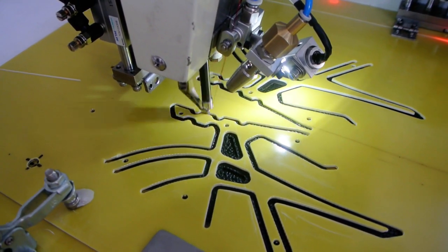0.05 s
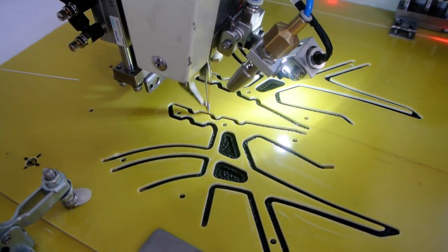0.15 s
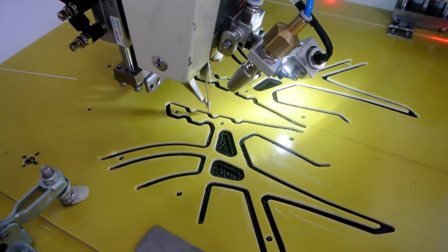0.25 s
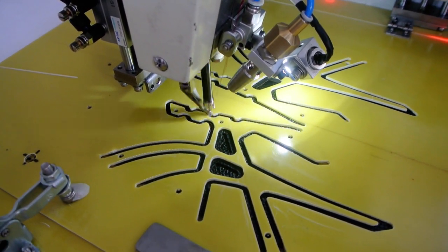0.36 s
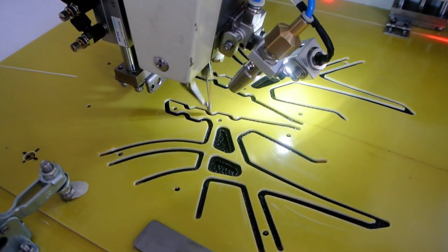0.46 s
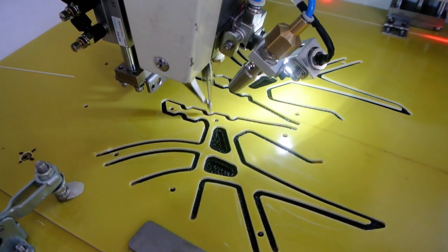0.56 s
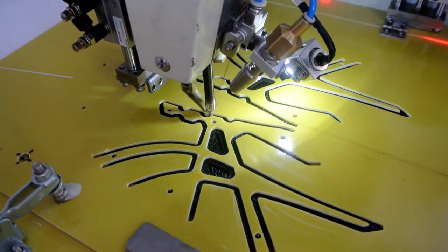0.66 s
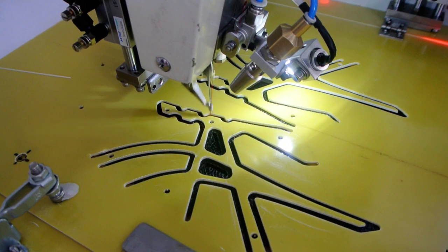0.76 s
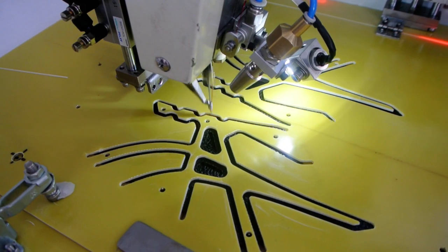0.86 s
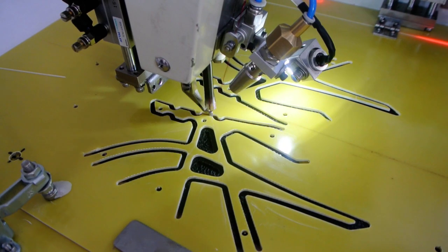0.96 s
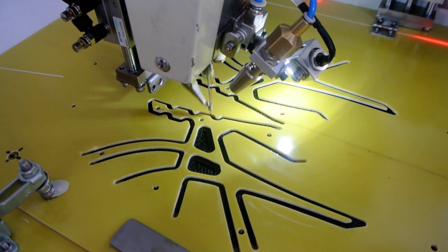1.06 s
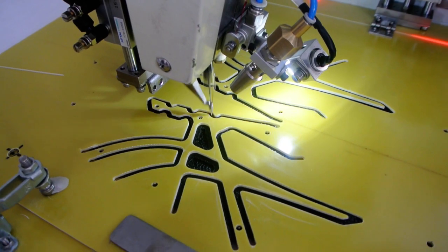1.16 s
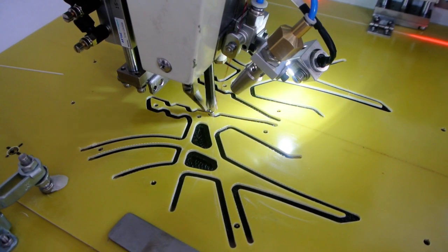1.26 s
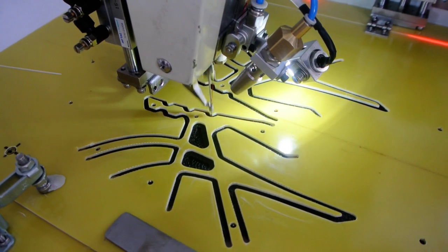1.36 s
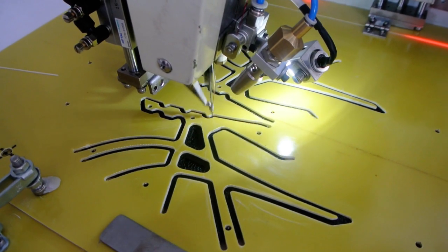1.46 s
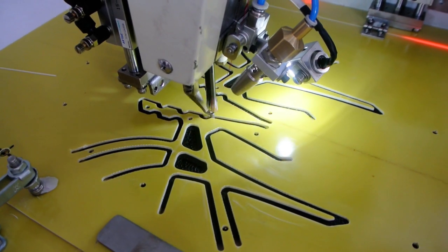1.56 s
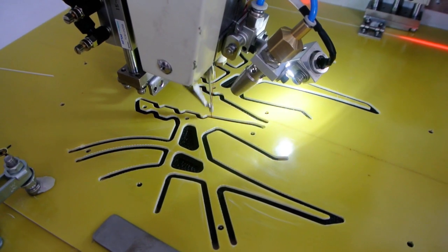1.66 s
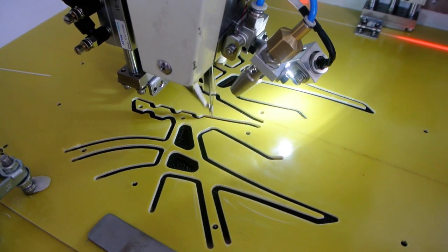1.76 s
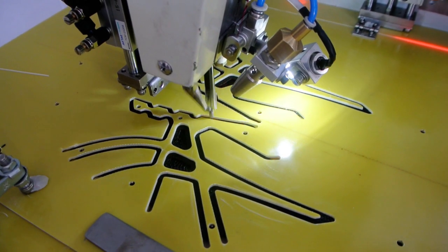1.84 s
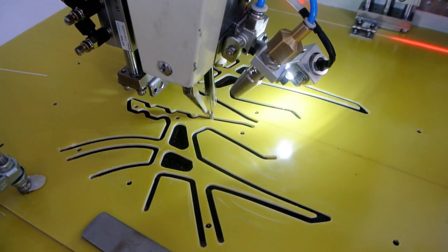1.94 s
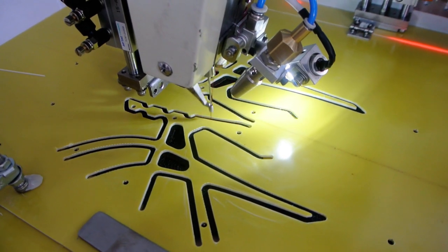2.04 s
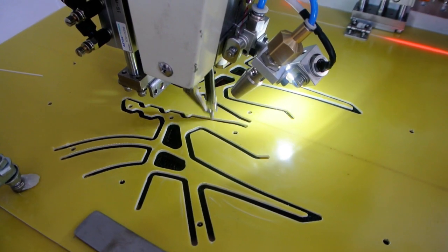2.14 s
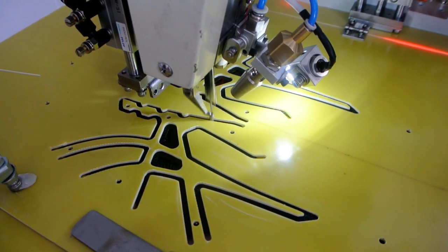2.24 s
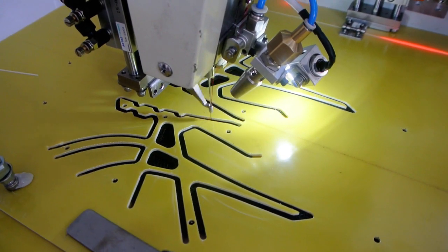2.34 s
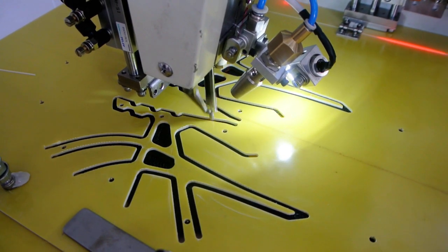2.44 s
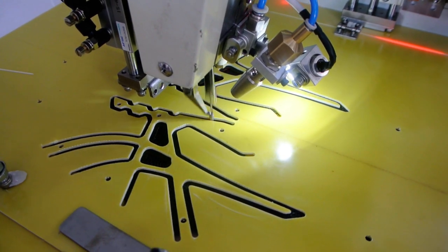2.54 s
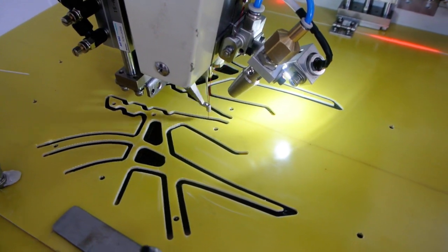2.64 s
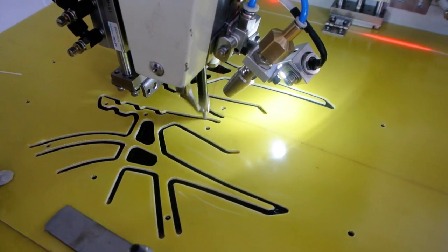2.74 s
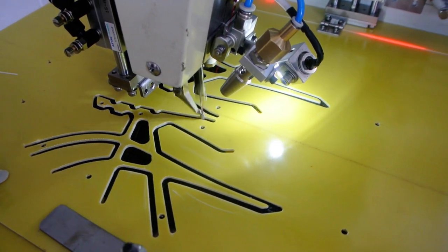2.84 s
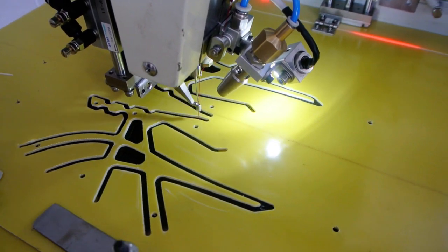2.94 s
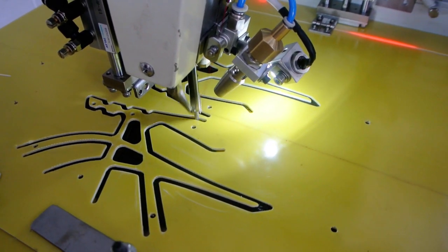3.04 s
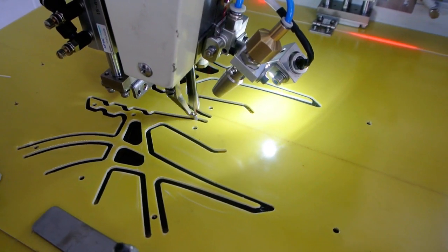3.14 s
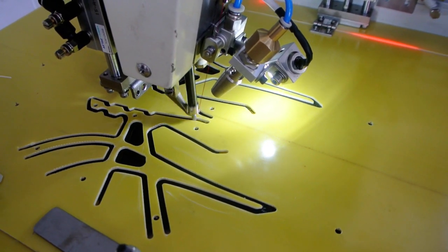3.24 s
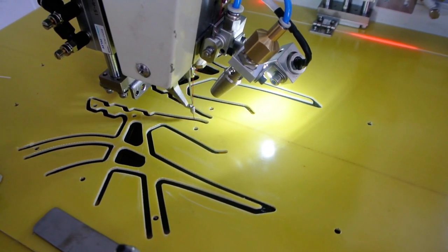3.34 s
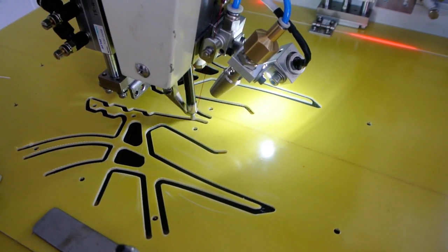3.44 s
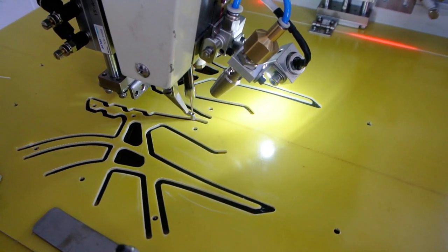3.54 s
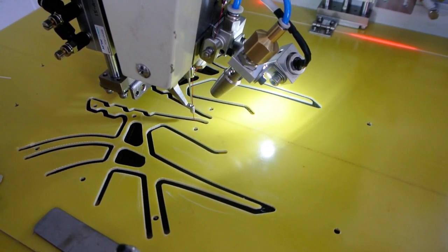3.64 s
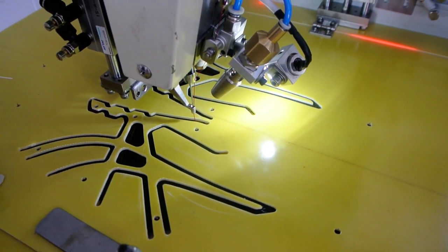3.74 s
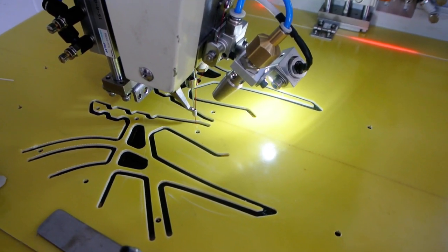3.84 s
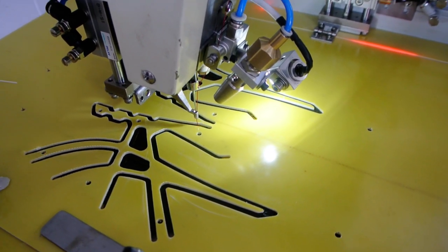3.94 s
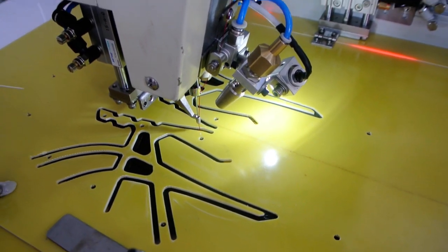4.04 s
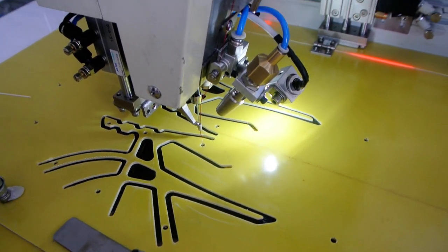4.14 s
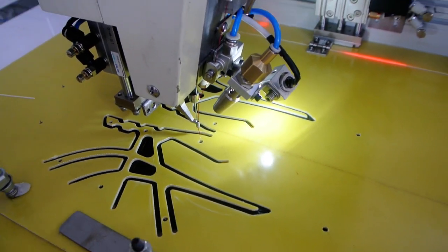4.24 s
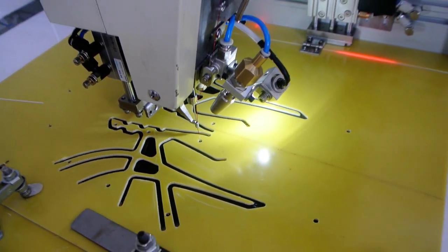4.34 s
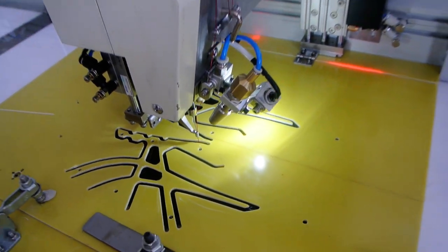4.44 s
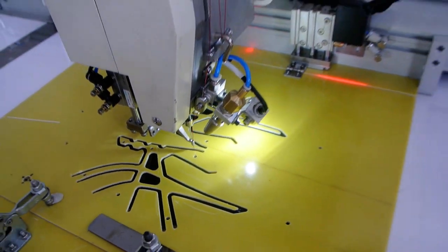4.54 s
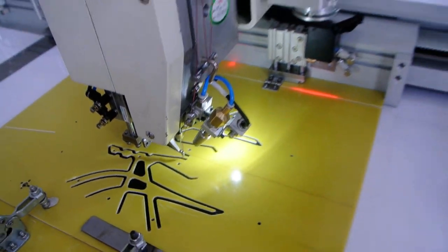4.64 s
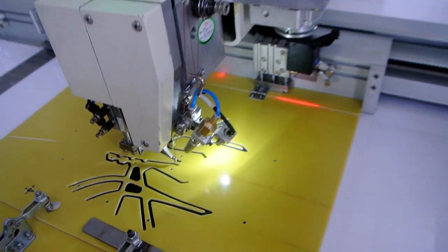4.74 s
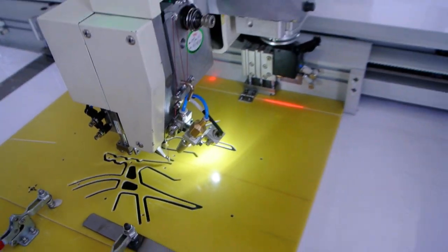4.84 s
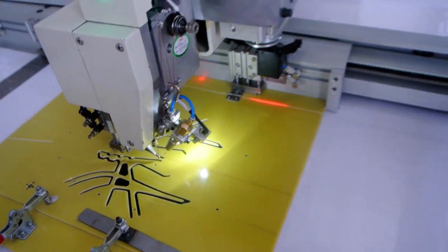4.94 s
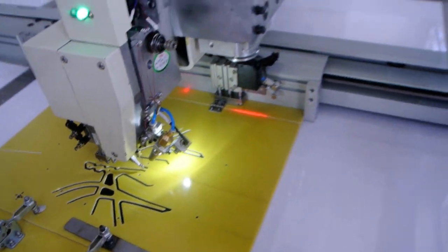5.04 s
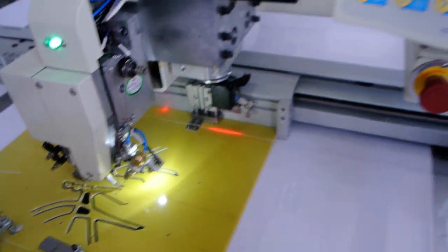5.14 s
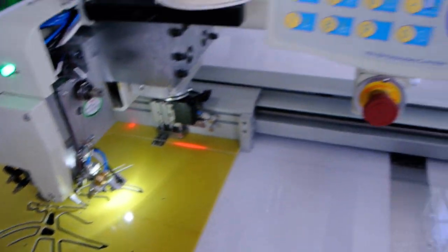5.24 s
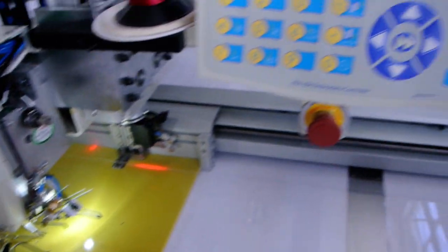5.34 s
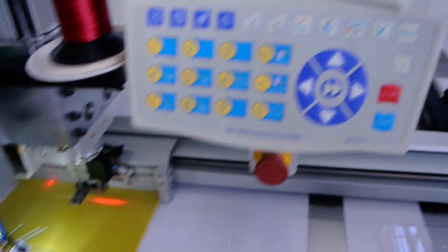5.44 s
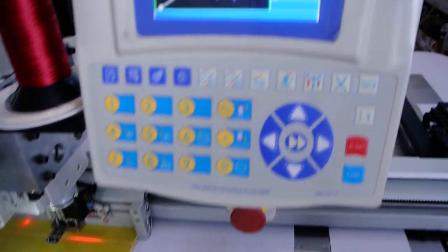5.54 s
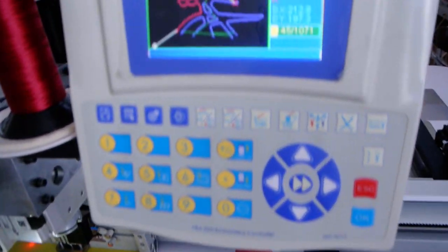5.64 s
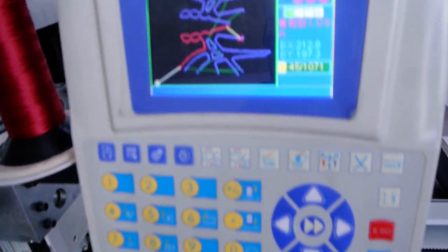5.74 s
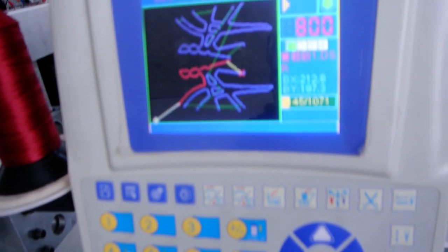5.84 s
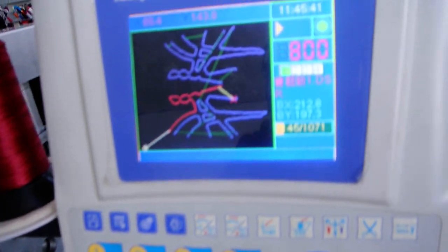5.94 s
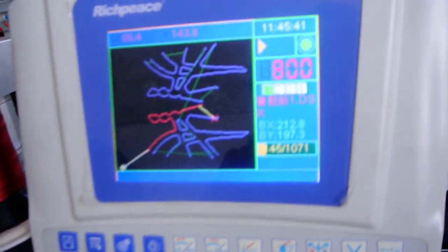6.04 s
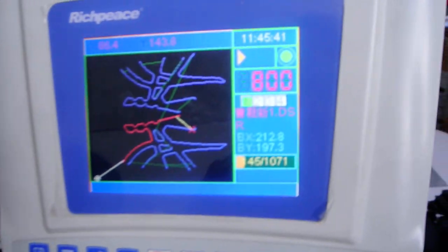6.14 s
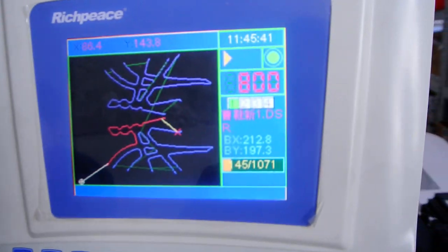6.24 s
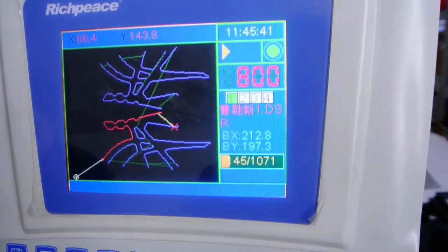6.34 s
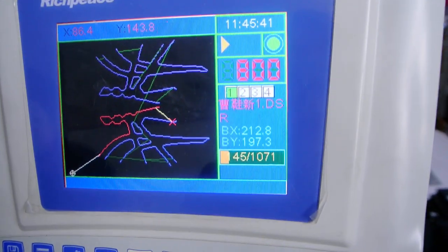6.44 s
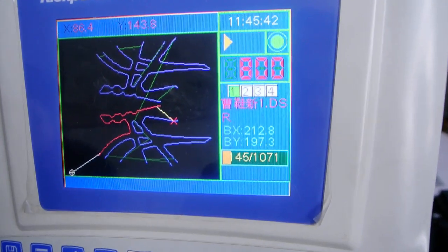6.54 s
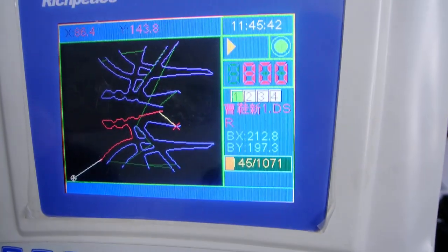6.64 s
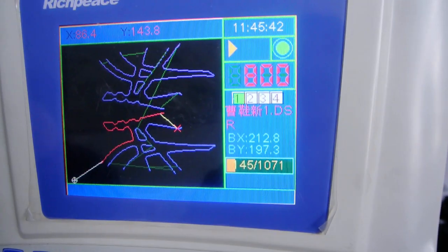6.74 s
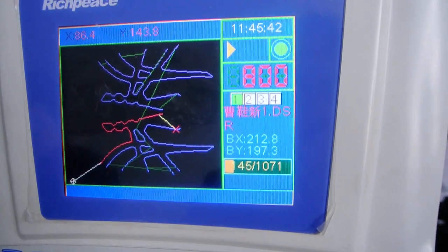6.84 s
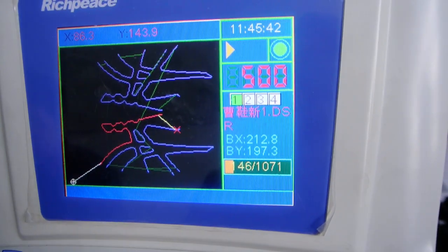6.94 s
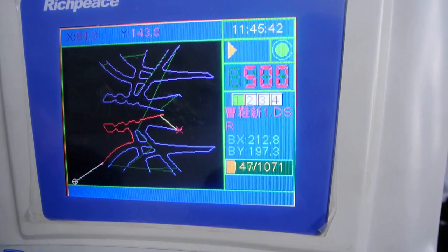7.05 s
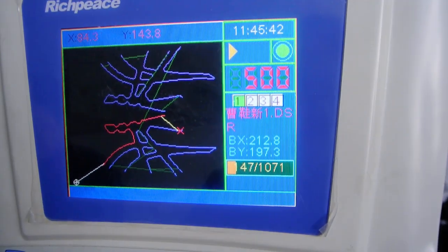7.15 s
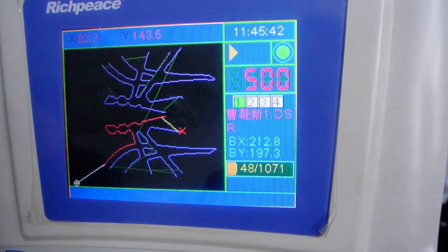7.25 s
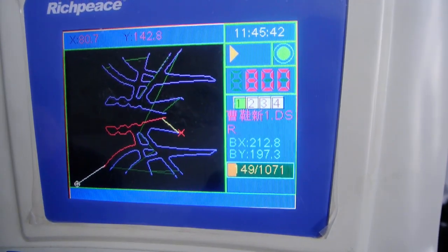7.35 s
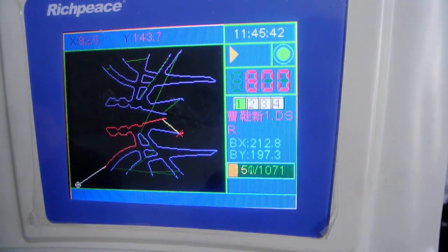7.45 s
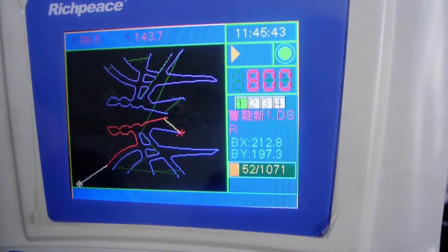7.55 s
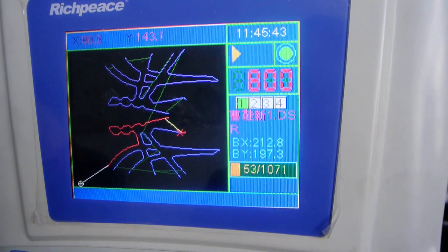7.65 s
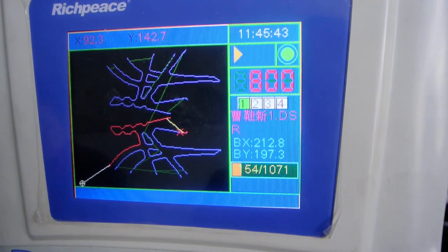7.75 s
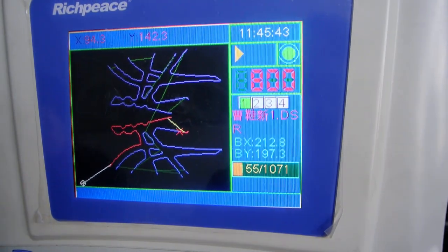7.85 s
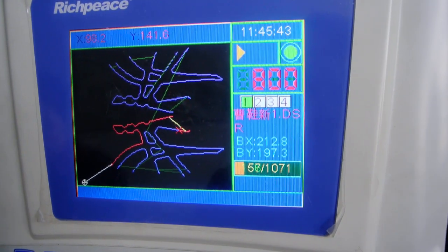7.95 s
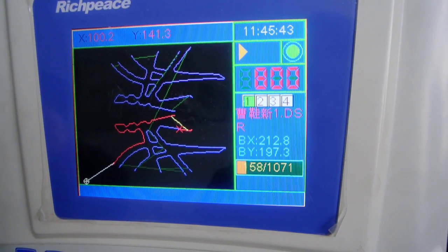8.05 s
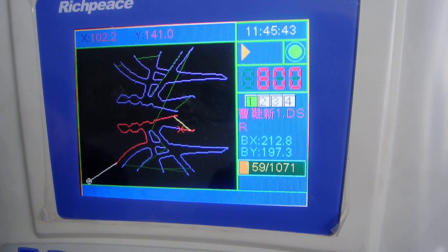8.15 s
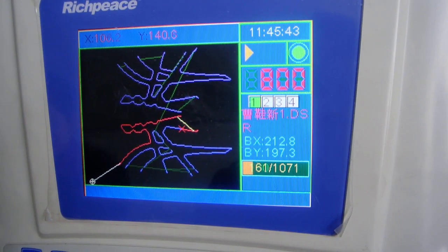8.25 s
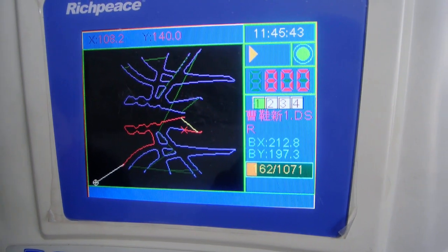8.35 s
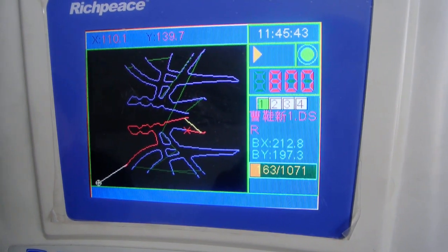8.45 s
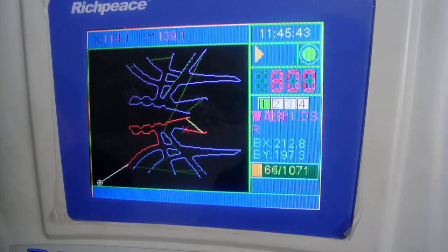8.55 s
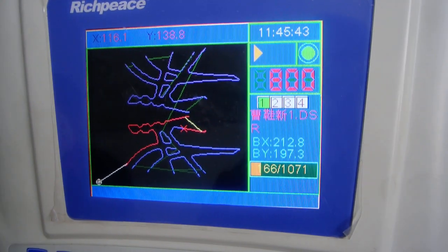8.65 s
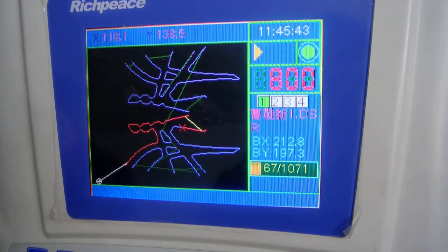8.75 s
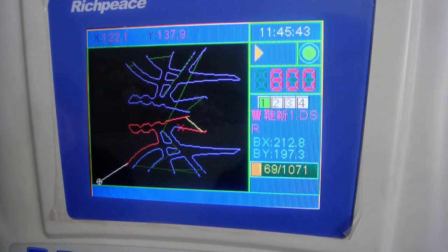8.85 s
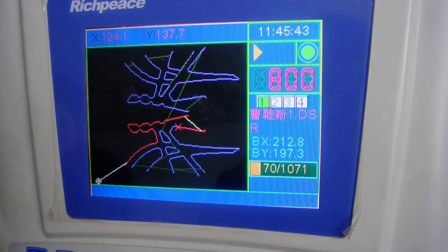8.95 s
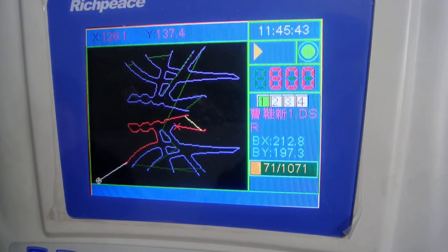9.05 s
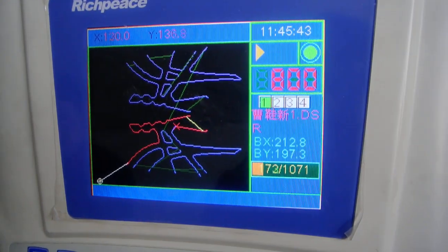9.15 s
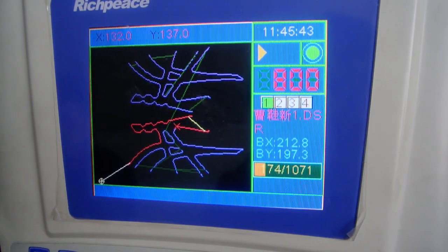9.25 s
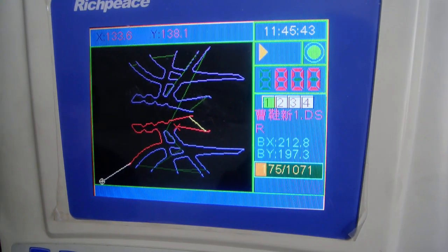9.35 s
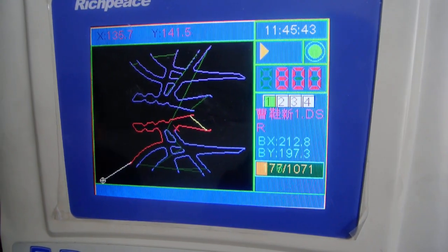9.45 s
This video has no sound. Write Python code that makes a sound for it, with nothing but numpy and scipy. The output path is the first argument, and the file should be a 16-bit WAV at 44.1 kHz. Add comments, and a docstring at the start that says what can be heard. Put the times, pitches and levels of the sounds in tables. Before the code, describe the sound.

Bright, steady air-jet hiss with a fluttering high whistle cuts off into valve clicks, two servo whines and booming thumps, then blasts back on.

```python
"""The air jet of a laser cutter's cutting head, close by: filtered noise with a fluttering nozzle resonance.
The carriage drive whirrs under it (coloured noise and wavering tones), and the hall rumbles below. The jet
shuts off; noise bursts click for valves and linkage, and a servo's stack of tones whines through two quick
moves. Knocks and thumps are short swelling cycles. During the pause the microphone moves from the head to the
control panel, where the jet starts again."""
import sys
import numpy as np
from scipy import signal
from scipy.fft import rfft, irfft
from scipy.io import wavfile
from scipy.ndimage import uniform_filter1d, map_coordinates

SR = 44100
rng = np.random.default_rng(int(sys.argv[2]) if len(sys.argv) > 2 else 0)


def wav_record(signal):
    """Record a signal, one row per channel, as 16-bit PCM in the file named by sys.argv[1]."""
    frames = np.transpose(np.atleast_2d(signal))
    bounded = np.clip(frames, -1, 1)
    # unit amplitude maps onto the largest positive 16-bit level
    quanta = np.round(bounded * 32767).astype(np.int16)
    wavfile.write(sys.argv[1], SR, quanta)


N = 418509
TIME = np.arange(N) / SR  # s
HZ = np.fft.rfftfreq(N, 1 / SR)

# All colour tables give relative spectral levels: frequency_hz, level_db (per Hz).
# Colour of the jet, close to the head and beside the panel: frequency_hz, level_db
JET_COLOUR_HEAD = [(880, -36.5), (1500, -33.5), (2000, -24.5), (2770, -26), (4330, -21.5), (4730, -20),
                   (5490, -14), (6630, 1.5), (6890, -1), (7690, -15.5), (9560, -10.5), (10700, -15),
                   (11600, -7.5), (12400, -7), (14600, -18), (15600, -18)]
JET_COLOUR_PANEL = [(1180, -23), (2000, -20), (4010, -22), (4380, -14.5), (4850, -14.5), (5200, -6),
                    (5550, -5.5), (5950, 2), (6150, -5), (6330, 9), (6520, 6), (6650, 3), (6820, 5),
                    (7150, 0), (8250, -11.5), (9050, -6), (10100, -6.5), (11300, -4), (11650, -0.5),
                    (11930, -1), (12180, -7), (12380, -5), (12600, -11), (12900, -9.5), (15700, -15)]
# The two microphone ports at the head, at the panel and in the pause: left_lead_ms,
# then [frequency_hz, likeness (limited to 0-1)], then [frequency_hz, left_minus_right_db]
PORTS_HEAD = (0.014, [(250, 1), (1000, 0.64), (4000, 0.93), (6600, 0.8), (9000, 1), (12000, 0.5),
              (15000, 1.5)], [(60, 0.0), (110, 0.0), (200, 11), (380, 0), (700, -0.5), (1290, 0.5),
              (2380, -1), (4400, 0), (8120, -2.5), (15000, 2)])
PORTS_PANEL = (0.11, [(250, 0.97), (2000, 0.64), (6500, 0.65), (15000, 0.19)], [(60, -3), (110, -2),
               (200, -2), (380, -0.5), (700, 0), (1290, 0.5), (2380, -1), (4400, 3), (8120, 4),
               (15000, 10)])
PORTS_PAUSE = (0.087, [(30, .6), (90, 1), (250, 0.96), (700, 0.97), (2000, 0.38), (4000, 0.097)],
               [(60, 0.69), (240, 0.55), (950, 0.5), (3770, 1.7), (15000, 8.4)])
# Reflection of the jet from the table as the microphone pulls away: time_s, delay_ms, strength
TABLE_ECHO = [(4.1, .775, 0), (4.4, .745, .22), (4.9, .712, .28), (5.24, .69, .22)]
# Faint reflections from nearby parts, at each place: left_delay_ms, right_delay_ms, strength
# (ECHO_STRETCH scales the delays at the head)
HEAD_ECHOES = [(.454, .508, .08), (1.146, 1.384, .16), (1.384, 1.214, .09), (1.64, 1.508, .09),
               (1.93, 1.114, .11), (2.086, 1.66, .08)]
PANEL_ECHOES = [(1.778, 1.878, .11), (2.1, 2.232, .1), (2.342, .97, .08), (2.024, 2.72, .07)]
# Scaling of the head's delays as the microphone moves: time_s, delay_ratio
ECHO_STRETCH = [(0, 1.07), (1.4, 1.06), (2, 1.03), (2.8, 1), (4.25, .996), (4.65, .935), (5.24, .885)]
# Bend of the nozzle's resonance over time: time_s, pitch_ratio
NOZZLE_BEND = [(0, 1.003), (1.85, 1.012), (2.5, .993), (3.9, .997), (4.6, .992), (5.15, 1.004)]
# Colour of the carriage drive at each place: frequency_hz, level_db
WHIRR_COLOUR_HEAD = [(160, -18.5), (280, -9.5), (370, -2.5), (499, -5.5), (579, 0.5), (718, -3), (788, -6),
                     (1140, -0.5), (1420, -7.5), (2020, -7), (2600, -23), (3380, -23), (5720, -120)]
WHIRR_COLOUR_PANEL = [(160, -23), (280, -7), (485, -1), (585, 1), (834, -2.5), (941, -2), (1190, -2),
                      (1680, -8.5), (2600, -37), (3380, -51), (5720, -120)]
# Carriage drive tones at each place, before a common gain: pitch_hz, level_db
DRIVE_TONES_HEAD = [(371.4, -64.5), (468.3, -65.5), (576.0, -61), (694.4, -64), (732.1, -62.5),
                    (882.9, -65.5), (963.6, -60), (1016, -72), (1109, -57.5), (1123, -60), (1190, -61),
                    (1335, -60.5), (1922, -61.5)]
DRIVE_TONES_PANEL = [(521, -56), (576.0, -50.5), (600, -53), (748.3, -51), (882.9, -58), (915, -55),
                     (963.6, -53.5), (1044, -52.5), (1669, -55)]
# Colour of the low rumble, at the head and further on: frequency_hz, level_db
RUMBLE_COLOUR_HEAD = [(25, -55), (50, -48), (80, -20), (120, -18.5), (180, -0.5), (240, -0.5), (285, -14),
                      (350, -11), (450, -23.5), (730, -70)]
RUMBLE_COLOUR_BEYOND = [(25, -55), (50, -45), (80, -15.5), (120, -14), (170, -3), (240, 0.5), (285, -7.5),
                        (340, -4.5), (450, -16), (730, -53)]
# Separate low bumps, each swelling and fading: top_s, half_length_s, level_db
RUMBLE_BUMPS = [(0.857, 0.026, -49), (1.366, 0.17, -47), (2.38, 0.031, -43), (2.605, 0.026, -41),
                (3.965, 0.065, -43), (5.25, 0.023, -34.5), (6.341, 0.067, -29), (6.61, 0.036, -16.5),
                (6.75, 0.055, -24), (7.55, 0.055, -36.5), (7.998, 0.055, -32.5), (9.298, 0.063, -35.5)]
# Dull thumps of the frame: start_s, peak_db, pitch_hz, rise_s
FRAME_THUMPS = [(1.19, -38, 216, 0.016), (1.36, -42.5, 165, 0.05), (2.575, -34, 204.6, .02),
                (2.84, -43, 180, .08), (3.22, -42.5, 162, 0.023), (3.5, -37, 215, .012),
                (4.2, -45, 190.4, .04), (4.865, -46, 306, .015), (4.955, -42, 310, .012),
                (5.246, -31, 235, 0.011), (5.29, -32, 243, 0.009), (5.345, -30, 234, 0.013),
                (5.485, -33.5, 175, 0.03), (5.62, -32, 174, 0.023), (5.755, -33, 350, 0.014),
                (5.825, -32, 230, .02), (5.91, -31.5, 492, 0.01), (6.016, -20, 224, 0.0069),
                (6.268, -29, 190, 0.014), (6.275, -29, 642, 0.0063), (6.33, -21, 500, 0.0099),
                (6.591, -13, 239, 0.0048), (6.611, -8, 247, 0.0044), (6.71, -23, 181, 0.0088)]
# Hollow knocks at the head: start_s, ring_db, thud_db, pitch_hz, housing_gain_db, crack_db
HEAD_KNOCKS = [(3.581, -30, -35, 1020, -65, -48), (3.5955, -16, -40, 1006, -37.5, -20),
               (3.6065, -22, -33, 930, -34.5, -36), (4.014, -38, -42.5, 620, -60, -45),
               (4.864, -42, -42.5, 600, -58, -50), (4.892, -37, -46, 915, -59, -45),
               (4.958, -41, -44, 560, -62, -50), (4.982, -41, -45, 850, -60, -50),
               (5.061, -40, -49, 1410, -55, -44), (5.098, -38, -42, 564, -60, -50),
               (6.825, -11, -29, 1030, -42, -37), (6.894, -32, -32.5, 1320, -50, -28),
               (7.343, -26, -35, 1360, -58, -42)]
# Ringing modes of the housing: pitch_hz, relative level_db, t60_s
HOUSING_MODES = [(680, 5, 0.31), (811, -6.5, 0.37), (860, -3, 0.2), (1207, -6, 0.4), (1970, -11, .2)]
# Decay of the hall: frequency_hz, t60_s
HALL_DECAY = [(200, 0.91), (1000, 0.081), (4000, 0.54), (12000, 0.089)]
# Short spits of coarser air: top_s, half_length_s, level_db
AIR_SPITS = [(3.61, 0.016, -28), (6.809, 0.018, -24)]
# Colour of the spits and of the knocks' dry cracks: frequency_hz, level_db
SPIT_COLOUR = [(150, -45), (800, -2), (2000, -4), (4200, 4), (8000, 0), (15000, -0.5)]
# Colours of the servo's mechanism, body and airy hiss: frequency_hz, level_db
SERVO_BODY_COLOUR = [(180, -18), (300, -2), (481, -6), (683, -7), (749, -2.5), (797, -8), (1460, -8),
                     (1670, -12), (2000, -7), (2650, -33), (3500, -28), (4550, -51), (7700, -120)]
SERVO_AIR_COLOUR = [(1470, -38), (2500, 1.5), (2760, -6), (2940, -1), (4820, -5.5), (5750, -6), (11400, -8),
                    (13500, -7.5)]
# Loud valve snaps, then light linkage clicks, before a common gain: start_s, bright_db, clack_db
VALVE_SNAPS = [(5.2445, -20, -31), (6.1035, -32, -17.5), (6.131, -18, -24.5)]
LINKAGE_CLICKS = [(5.3238, -40, -55), (5.3478, -38, -62), (5.36, -42, -66), (5.3777, -32, -66),
                  (5.4076, -35, -60), (5.4171, -37, -64), (5.428, -38, -64), (5.4774, -36, -60),
                  (5.5045, -36, -60), (5.621, -41, -60), (5.676, -44, -60), (5.883, -33.5, -40),
                  (5.9688, -43, -43), (6.0046, -30, -44), (6.2268, -29, -43), (6.249, -32, -50),
                  (6.27, -29.5, -47), (6.277, -32, -43), (6.2874, -31, -45), (6.2982, -33, -39),
                  (6.31, -33, -42), (6.606, -38, -44), (6.632, -44, -48), (6.657, -38, -46),
                  (6.686, -42, -46)]
# Colours of the snaps, the light ticks and the clack below both: frequency_hz, level_db
SNAP_COLOUR = [(1000, -16), (2000, -2), (3000, -9), (3800, -4), (4900, -3), (7000, -3), (8200, 5),
               (10000, 1), (11200, 5), (12100, 0), (13100, 6), (14200, -9), (16000, -14)]
TICK_COLOUR = [(2650, -30), (4500, -21), (4950, -8), (5680, -8), (7820, -2), (8970, -4), (10400, 5),
               (11300, 13), (12100, 2), (13500, -7), (16000, -15)]
CLACK_COLOUR = [(200, -27), (710, -18), (1200, -12), (1480, -17), (1780, 1.5), (2480, -5.5), (2930, 4),
                (3270, -6.5), (3560, -8.5), (4430, -19), (4950, -6), (5610, -16), (7860, -13), (9000, -24),
                (11700, -23), (16000, -27)]
# Quick moves of the servo motor: start_s, braking_start_s
SERVO_MOVES = [(5.385, 5.885), (6.28, 6.78)]
# Servo tones, before a common gain: shaft_multiple, first_move_db, second_move_db
SERVO_ORDERS = [(3.55, -54, -35), (4.26, -52, -41), (4.985, -51, -38), (6.37, -53, -39.5), (6.88, -59, -50),
                (8.01, -54, -33.5), (9, -53, -43.5), (12.02, -53, -45), (12.77, -51, -42.5),
                (13.01, -58, -44), (14.2, -55, -47), (15.01, -49.5, -40), (15.93, -55, -43),
                (16.15, -58, -47), (19.2, -60, -48), (19.83, -54, -49), (20.01, -52, -38.5),
                (21.55, -60, -50), (22, -60, -50), (23.95, -66, -54)]
# Sidebands below the inverter's carrier, relative: shaft_multiple, level_db
CARRIER_SIDEBANDS = [(5, -24), (10, 0), (15, -26), (20, -5)]

# Air valve: the jet bleeds away as it shuts, stops when it seals, and overshoots when it opens
JET_SHUT_S, JET_BLEED_S, JET_SEALED_S = 5.15, 0.047, 5.235
JET_OPEN_S, JET_RISE_S, SURGE_DB, SURGE_S = 6.794, 0.016, 4, 0.027
# The carriage drive slows to a creep, rests during the pause, then sets off again
CREEP_S, REST_S, RESUME_S, DRIVE_RAMP_S = 3.23, 5.24, 6.86, 0.05
SERVO_RAMP_S, SERVO_TURNS_PER_S, CARRIER_HZ = 0.08, 93.95, 16180
# The microphone closes in on the servo and the panel between these times
ARRIVE_FROM_S, ARRIVE_S = 5.22, 6.82
BASS_CUT_HZ, EDGE_HZ = 58, 15800


def amp(db):
    """Decibels to gain."""
    return 10 ** (np.asarray(db) / 20)


def unit(x):
    """Scales to rms 1."""
    return x / np.sqrt(np.mean(x ** 2) + 1e-20)


def read(points, hz):
    """Reads a table of (Hz, value) on a log-frequency axis."""
    f, value = np.transpose(points)
    return np.interp(np.log(hz + 1), np.log(f + 1), value)


def add(mix, start_s, sound):
    """Adds a stereo sound at its start time."""
    part = mix[:, round(start_s * SR):][:, :sound.shape[1]]
    part += sound[:, :part.shape[1]]


def drift(rate):
    """Slow chance of rms 1, with about rate changes a second."""
    return unit(irfft(rfft(rng.standard_normal(N)) * np.exp(-(HZ / rate) ** 2), N))


def release(off_s, fade_s):
    """Full strength until off_s, then an exponential fade."""
    return np.exp(-np.maximum(TIME - off_s, 0) / fade_s)


def gate(on_s, off_s, rise_s, fade_s):
    """Attack, hold and release, as a gain over time."""
    return np.clip((TIME - on_s) / rise_s, 0, 1) * release(off_s, fade_s)


def swell(top_s, half_s, db):
    """A bell-shaped rise and fall of gain."""
    return amp(db) * np.exp(-.5 * ((TIME - top_s) / half_s) ** 2)


def approach(db, db_per_s):
    """Gain that grows to db as the microphone closes in."""
    return amp(db + db_per_s * np.minimum(TIME - ARRIVE_S, 0))


def port_spectra(colour, ports):
    """Coloured noise spectra at the two ports: partly alike, with a time lead and a level balance."""
    lead_ms, likeness, balance = ports
    same = np.clip(read(likeness, HZ), 0, 1)
    tilt_db = read(balance, HZ)
    left, other = rng.standard_normal((2, len(HZ))) + 1j * rng.standard_normal((2, len(HZ)))
    right = same * left + np.sqrt(1 - same ** 2) * other
    right = right * np.exp(-2j * np.pi * HZ * lead_ms / 1000)
    return np.array([left * amp(tilt_db / 2), right * amp(-tilt_db / 2)]) * amp(read(colour, HZ))


def noise(colour, ports):
    """Steady stereo noise of rms 1."""
    return unit(irfft(port_spectra(colour, ports), N))


def tones(table, wander, flutter_db, count=160):
    """Tones that each waver in pitch (a ratio) and level, between count random points over the whole."""
    knots = np.linspace(0, N / SR, count)
    out = np.zeros(N)
    for hz, db in table:
        bend, flutter = (np.interp(TIME, knots, v) for v in rng.standard_normal((2, count)))
        phase = 2 * np.pi * np.cumsum(hz * (1 + wander * bend)) / SR
        out += amp(db + flutter_db * flutter) * np.sin(phase)
    return np.sqrt(2) * out  # levels are rms


def jet(colour, ports, hiss_db, whistle_db, whistle_hz, half_width_hz, flutter_db, sway_db, low_hz):
    """Turbulent air: a broad hiss, and a fuzzy nozzle resonance that flutters and sways on its own."""
    air = port_spectra(colour, ports) * HZ / np.hypot(HZ, low_hz)
    nozzle = np.exp(-((HZ - whistle_hz) / half_width_hz) ** 4)
    hiss = unit(irfft(air * (1 - nozzle), N)) * amp(hiss_db + 0.76 * drift(27))
    whistle_level_db = whistle_db + flutter_db * drift(30) + sway_db * drift(1.8)
    whistle = unit(irfft(air * nozzle, N)) * amp(whistle_level_db)
    return hiss, whistle


def bent(x, curve):
    """The stereo sound with its pitch following a curve of (s, ratio)."""
    place = np.cumsum(np.interp(TIME, *np.transpose(curve)))
    return np.array([map_coordinates(side, [place], order=3, mode="mirror") for side in x])


def delayed(x, left_ms, right_ms):
    """The stereo sound after a steady or moving delay in each ear."""
    places = [(TIME - ms / 1000) * SR for ms in (left_ms, right_ms)]
    return np.array([map_coordinates(side, [place], order=3) for side, place in zip(x, places)])


def head_echo(x):
    """Reflections ripple the hiss, differently in each ear; as they shorten, their combs sweep upward."""
    time_s, delay_ms, strength = np.transpose(TABLE_ECHO)
    table_ms, share = np.interp(TIME, time_s, delay_ms), np.interp(TIME, time_s, strength)
    stretch = np.interp(TIME, *np.transpose(ECHO_STRETCH))
    near = sum(gain * delayed(x, left_ms * stretch, right_ms * stretch)
               for left_ms, right_ms, gain in HEAD_ECHOES)
    return (x + near + share * delayed(x, table_ms, table_ms)) / np.sqrt(1 + share ** 2)


def jet_at_head():
    """Close to the head, the jet blows evenly, bleeds away as the valve shuts, and stops when it seals."""
    hiss, whistle = jet(JET_COLOUR_HEAD, PORTS_HEAD, hiss_db=-21.5, whistle_db=-22.0, whistle_hz=6660,
                        half_width_hz=830, flutter_db=0.63, sway_db=0.46, low_hz=300)
    flow = release(JET_SHUT_S, JET_BLEED_S) * release(JET_SEALED_S, 0.007)
    return head_echo((hiss + bent(whistle, NOZZLE_BEND)) * flow)


def drive(travel_db, creep_db, panel_db):
    """The carriage whirrs as it steers the cutting head; its motor tones fall away when it slows to a creep."""
    travel = release(CREEP_S, DRIVE_RAMP_S)
    creep = (1 - travel) * release(REST_S, DRIVE_RAMP_S)
    near = noise(WHIRR_COLOUR_HEAD, PORTS_HEAD) * (amp(travel_db) * travel + amp(creep_db) * creep)
    near = near + amp(2.5) * tones(DRIVE_TONES_HEAD, wander=0.0012, flutter_db=1.0) * travel
    at_panel = amp(panel_db) * noise(WHIRR_COLOUR_PANEL, PORTS_PANEL)
    at_panel = at_panel + amp(-4.0) * tones(DRIVE_TONES_PANEL, wander=0.00195, flutter_db=4)
    return near + at_panel * np.clip((TIME - RESUME_S) / DRIVE_RAMP_S, 0, 1)


def rumble(head_db, pause_db, panel_db, lumps_db):
    """Lumpy low noise with a few stronger bumps, much alike in both ears; narrower at the head."""
    at_head = TIME < ARRIVE_FROM_S
    pause_gain = approach(db=pause_db, db_per_s=7.0)
    bed = np.select([at_head, TIME < ARRIVE_S], [amp(head_db), pause_gain], amp(panel_db))
    bed = uniform_filter1d(bed, size=2000) * amp(lumps_db * drift(24.0))
    near = uniform_filter1d(at_head * 1.0, size=2000)
    low = near * noise(RUMBLE_COLOUR_HEAD, PORTS_PAUSE)
    low = low + (1 - near) * noise(RUMBLE_COLOUR_BEYOND, PORTS_PAUSE)
    bump_power = sum(swell(*bump) ** 2 for bump in RUMBLE_BUMPS)
    return low * np.sqrt(bed ** 2 + bump_power)


def thumps():
    """The frame is shoved and answers with soft low cycles, short or booming."""
    t, out = np.arange(SR) / SR, np.zeros((2, N))
    for start_s, peak_db, pitch_hz, rise_s in FRAME_THUMPS:
        envelope = amp(peak_db) * t / rise_s * np.exp(1 - t / rise_s)
        sound = envelope * np.sin(2 * np.pi * pitch_hz * t)
        add(out, start_s, np.array([sound, sound]))
    return out


def burst(colour, t60):
    """A short stereo snap of coloured noise, dying 60 dB in t60 seconds."""
    t, hz = np.arange(4096) / SR, np.fft.rfftfreq(4096, 1 / SR)
    snap = irfft(rfft(rng.standard_normal((2, len(t)))) * amp(read(colour, hz)))
    return unit(snap) * amp(-60 * t / t60)


def knocks(rise_s, thud_t60, crack_t60, sharpness):
    """Hollow cycles swell and die over a dull burst near their pitch, with a dry crack; the housing rings on."""
    t, out = np.arange(12000) / SR, np.zeros((2, N))
    hz = np.fft.rfftfreq(len(t), 1 / SR)
    housing = sum(amp(db - 60 * t / t60) * np.sin(2 * np.pi * mode_hz * t)
                  for mode_hz, db, t60 in HOUSING_MODES)
    envelope = (t / rise_s * np.exp(1 - t / rise_s)) ** sharpness
    for start_s, ring_db, thud_db, pitch_hz, housing_db, crack_db in HEAD_KNOCKS:
        ring = np.sin(2 * np.pi * pitch_hz * t) * amp(ring_db) * envelope
        band = np.exp(-np.log((hz + 1) / pitch_hz) ** 2 / .5)
        thud = unit(irfft(rfft(rng.standard_normal(len(t))) * band)) * amp(thud_db - 60 * t / thud_t60)
        sound = ring + (thud + housing * amp(housing_db)) * np.minimum(t / rise_s, 1)
        add(out, start_s, np.array([sound, sound]))
        add(out, start_s + rise_s / 2, amp(crack_db) * burst(SPIT_COLOUR, crack_t60))
    return out


def hall(x):
    """A diffuse tail, each band dying at its own speed."""
    hz, t, z = signal.stft(rng.standard_normal((2, SR // 2)), SR, nperseg=256)
    decay = amp(-60 * t / read(HALL_DECAY, hz)[:, None])
    tail = signal.istft(z * decay, SR, nperseg=256)[1]
    return signal.fftconvolve(x, tail / np.linalg.norm(tail[0]), axes=1)[:, :N]


def spits():
    """A short coarse hiss comes with the knock at the head, and again as the valve opens."""
    return noise(SPIT_COLOUR, PORTS_HEAD) * sum(swell(*spit) for spit in AIR_SPITS)


def servo_speed():
    """Share of full speed: each move ramps up, holds and brakes."""
    return sum(np.clip((TIME - start_s) / SERVO_RAMP_S, 0, 1) - np.clip((TIME - brake_s) / SERVO_RAMP_S, 0, 1)
               for start_s, brake_s in SERVO_MOVES)


def chatter(per_s, size_db, ring_hz, width_hz):
    """Small ringing metal ticks at random moments, of uneven size, stronger on the left."""
    taps = (rng.random(N) < per_s / SR) * (.5 + rng.random(N))
    t = np.arange(400) / SR
    ring = np.exp(-np.pi * width_hz * t) * np.sin(2 * np.pi * ring_hz * t)
    return signal.oaconvolve(taps, ring)[:N] * amp(size_db) * amp([[2], [-2]])


def motor_tones(speed, first_db, second_db, swell_db_per_s):
    """The motor's stack of tones glides with its speed, warbles, grows through each move and lingers in the hall."""
    second = TIME > SERVO_MOVES[1][0]
    table = [(order * SERVO_TURNS_PER_S * speed, np.where(second, db2 + second_db, db1 + first_db))
             for order, db1, db2 in SERVO_ORDERS]
    lines = tones(table, wander=0.0014, flutter_db=3.5, count=260)
    middle_s = np.where(second, np.mean(SERVO_MOVES[1]), np.mean(SERVO_MOVES[0]))
    from_middle_s = np.clip(TIME - middle_s, -.5, .5)
    direct = np.array([lines, lines]) * speed ** 2 * amp(swell_db_per_s * from_middle_s)
    return direct + amp(-10.5) * hall(direct)


def servo(speed, idle_body_db, body_lift_db, idle_air_db, wind_up_db):
    """The mechanism idles in the pause and winds up at the second move; noise, chatter and tones rise with speed."""
    pause = gate(ARRIVE_FROM_S, ARRIVE_S, rise_s=0.0084, fade_s=0.039)
    motor = motor_tones(speed, first_db=-0.5, second_db=-1.5, swell_db_per_s=13)
    effort = amp(idle_body_db + body_lift_db * speed) + swell(top_s=6.29, half_s=0.032, db=wind_up_db)
    body = noise(SERVO_BODY_COLOUR, PORTS_PAUSE) * approach(db=-24.5, db_per_s=11.0) * effort
    air = noise(SERVO_AIR_COLOUR, PORTS_PAUSE) * amp(idle_air_db * (1 - speed) + 1.2 * drift(25))
    ticks = chatter(per_s=80, size_db=9.5, ring_hz=11500, width_hz=570) * amp(-12.5 + 5 * speed)
    return pause * (motor + body + (air + ticks) * approach(db=-30.0, db_per_s=8.0))


def clicks(table, colour, tick_db, clack_db, tick_t60, clack_t60):
    """Each click is a bright metal tick with a lower clack in the body, a little stronger on the left."""
    out = np.zeros((2, N))
    for start_s, bright_db, low_db in table:
        tick = amp(bright_db + tick_db) * burst(colour, tick_t60)
        clack = amp(low_db + clack_db) * burst(CLACK_COLOUR, clack_t60)
        add(out, start_s, tick + clack)
    return out * amp([[1], [-1]])


def whine(speed):
    """Sidebands of the inverter's switching tone slide down as the motor speeds up."""
    table = [(CARRIER_HZ - order * SERVO_TURNS_PER_S * speed, db) for order, db in CARRIER_SIDEBANDS]
    lines = tones(table, wander=.0001, flutter_db=.5)
    return lines * speed ** 4 * approach(db=-31.0, db_per_s=21.0) * amp([[3], [-3]])


def panel_echo(x):
    """Steady reflections beside the panel ripple the hiss, differently in each ear."""
    comb = sum(gain * np.exp(-2j * np.pi * HZ * np.array([[left_ms], [right_ms]]) / 1000)
               for left_ms, right_ms, gain in PANEL_ECHOES)
    return irfft(rfft(x) * (1 + comb), N)


def jet_at_panel(hiss_sag_db_per_s, whistle_sag_db_per_s):
    """From the panel, the jet restarts with a surge, then slowly grows fainter."""
    hiss, whistle = jet(JET_COLOUR_PANEL, PORTS_PANEL, hiss_db=-20.5, whistle_db=-22.0, whistle_hz=6400,
                        half_width_hz=1970, flutter_db=1.0, sway_db=1.07, low_hz=100)
    age = np.maximum(TIME - JET_OPEN_S, 0)
    surge = amp(SURGE_DB * np.exp(-np.maximum(age - JET_RISE_S, 0) / SURGE_S))
    flow = np.minimum(age / JET_RISE_S, 1) * surge
    sagging = hiss * amp(-hiss_sag_db_per_s * age) + whistle * amp(-whistle_sag_db_per_s * age)
    return panel_echo(flow * sagging)


def scene():
    """Jet, drive, servo and rumble, with the clicks and knocks in the hall."""
    speed = servo_speed()
    air = jet_at_head() + spits() + jet_at_panel(hiss_sag_db_per_s=1.08, whistle_sag_db_per_s=0.75)
    motors = drive(travel_db=-44.0, creep_db=-51.5, panel_db=-41.5) + whine(speed)
    motors = motors + servo(speed, idle_body_db=-6.0, body_lift_db=4.0, idle_air_db=-11.5, wind_up_db=-22)
    lows = rumble(head_db=-49.0, pause_db=-31.5, panel_db=-44, lumps_db=2.5) + thumps()
    snaps = clicks(VALVE_SNAPS, SNAP_COLOUR, tick_db=8.0, clack_db=5.0, tick_t60=0.027, clack_t60=0.04)
    snaps = snaps + clicks(LINKAGE_CLICKS, TICK_COLOUR, tick_db=9.5, clack_db=5.5, tick_t60=0.02, clack_t60=0.047)
    raps = knocks(rise_s=0.0045, thud_t60=0.2, crack_t60=0.06, sharpness=7.5)
    return air + motors + lows + snaps + raps + hall(amp(-12.0) * snaps + amp(-7.0) * raps)


def record(dry):
    """The microphone's bass roll-off, then the recorder's band limit."""
    thinned = irfft(rfft(dry) * HZ ** 2 / np.hypot(HZ ** 2, BASS_CUT_HZ ** 2), N)
    band_limit = signal.firwin(1023, EDGE_HZ, window=("kaiser", 9), fs=SR)
    return signal.oaconvolve(thinned, band_limit[None], "same")


dry = scene()
out = record(dry)
wav_record(out)
```